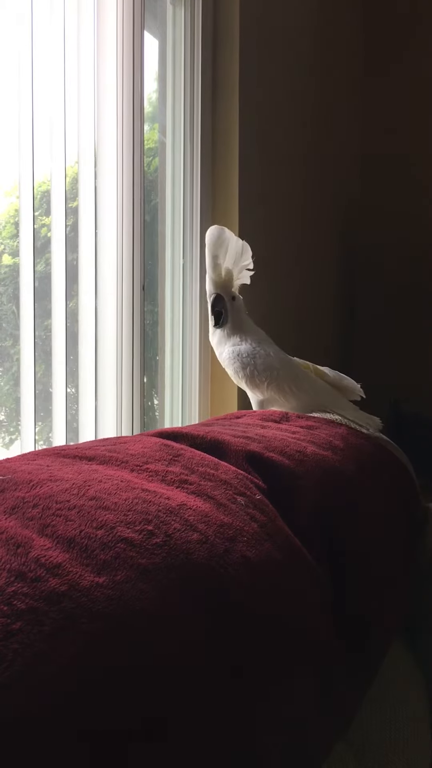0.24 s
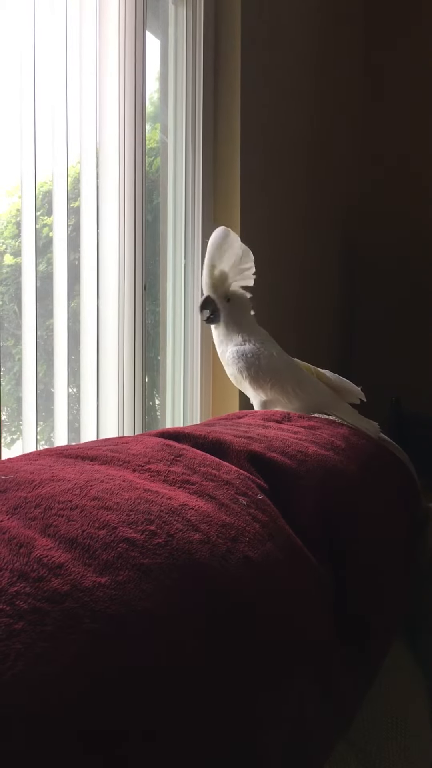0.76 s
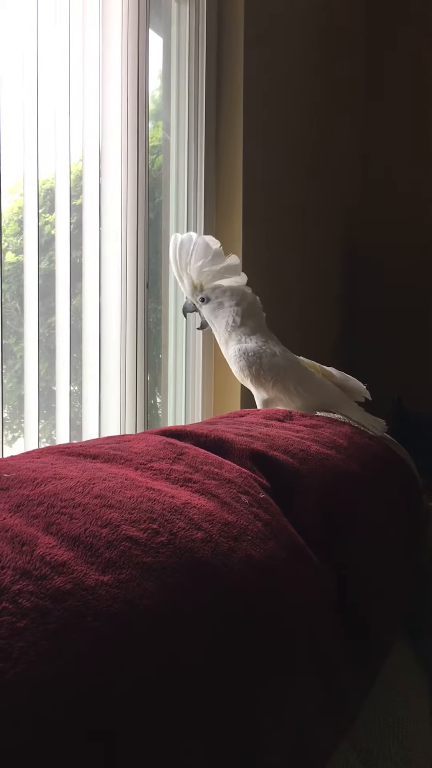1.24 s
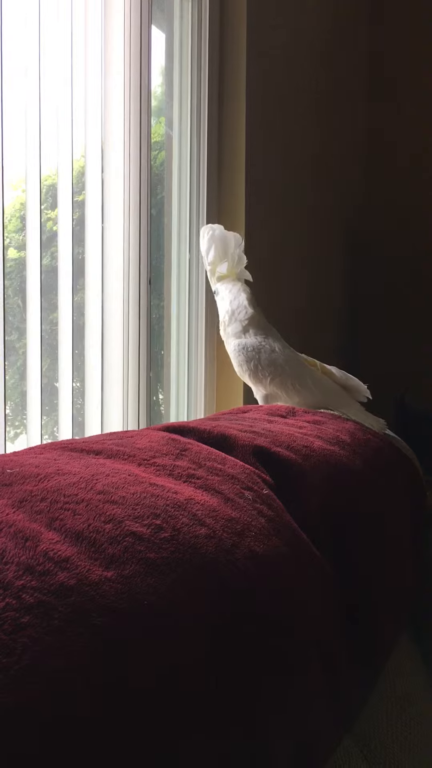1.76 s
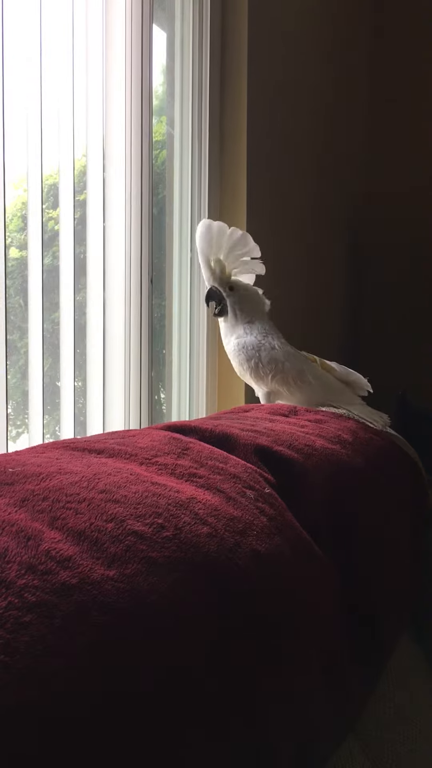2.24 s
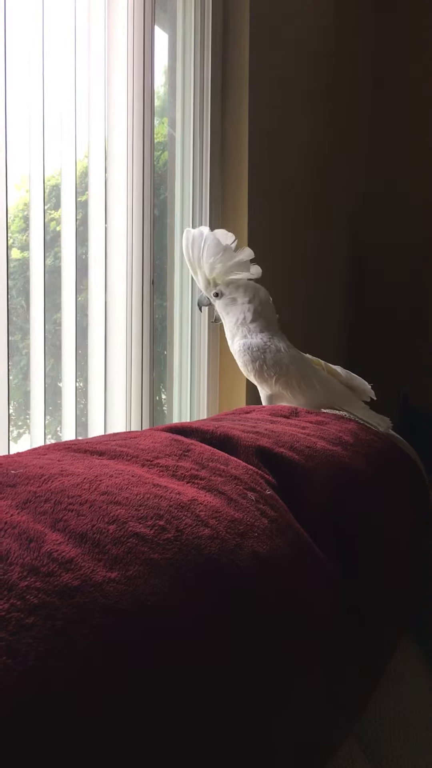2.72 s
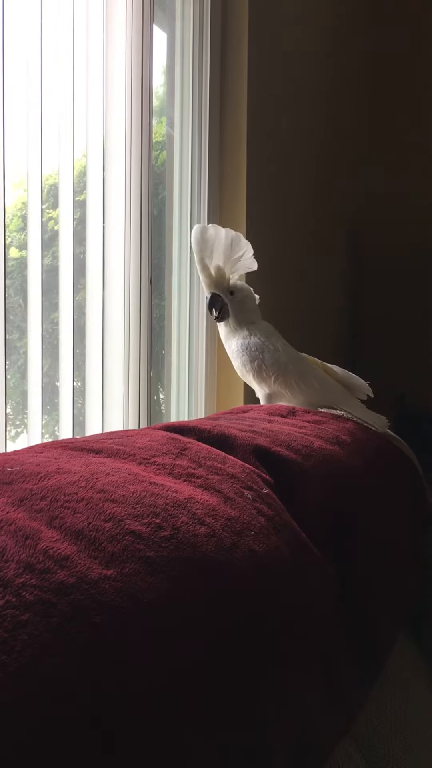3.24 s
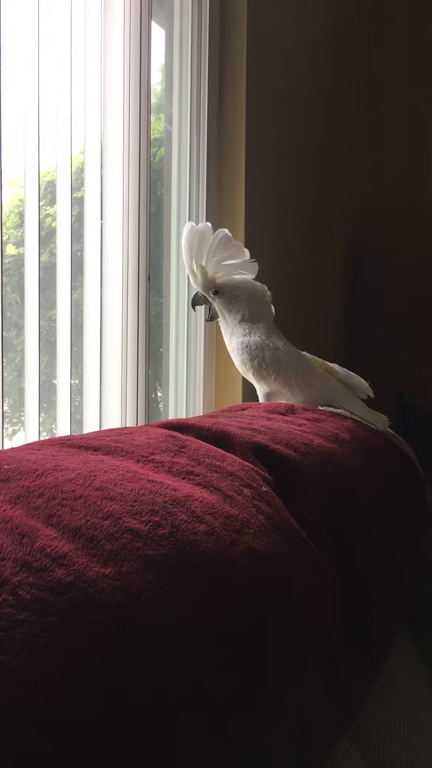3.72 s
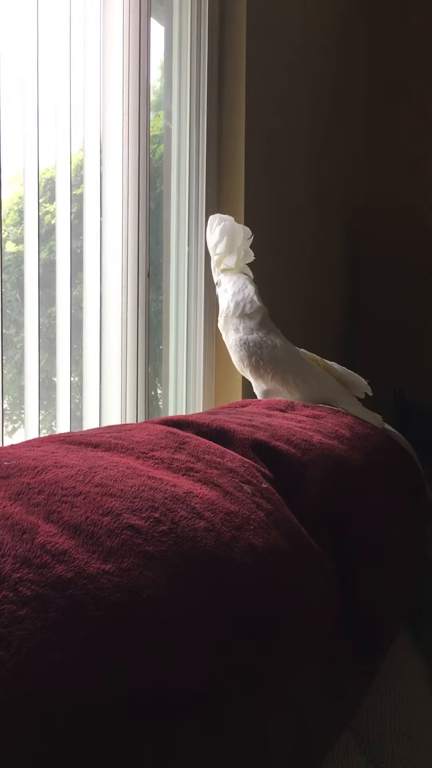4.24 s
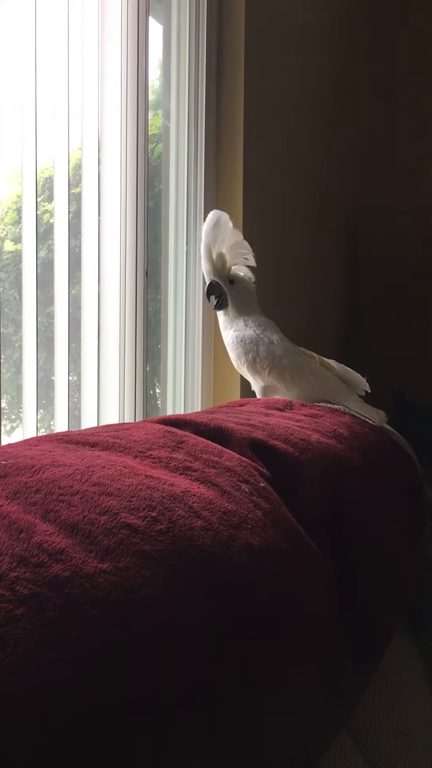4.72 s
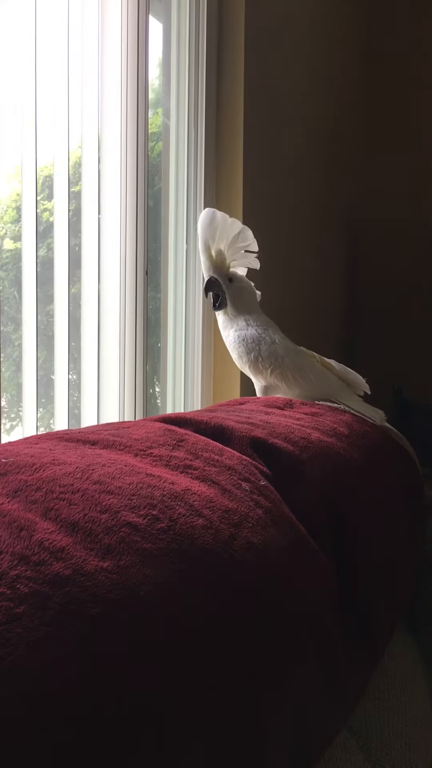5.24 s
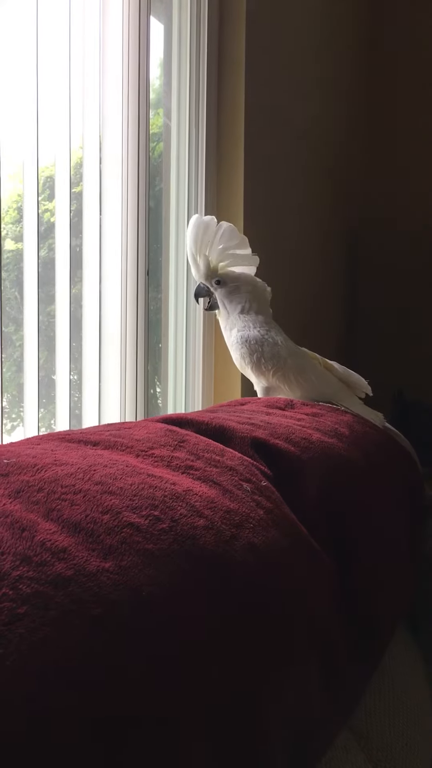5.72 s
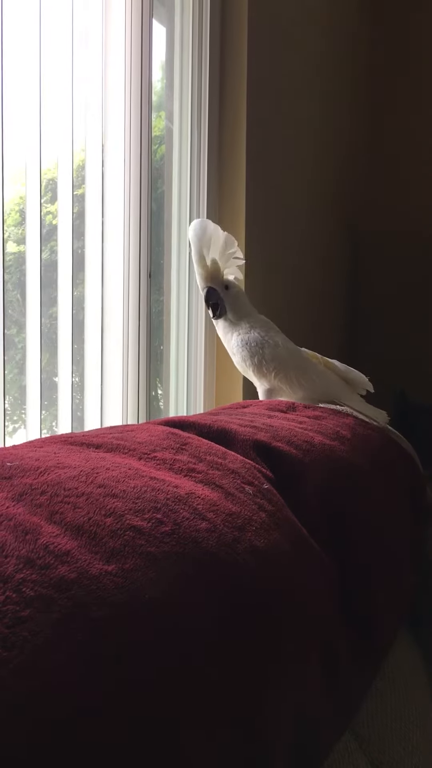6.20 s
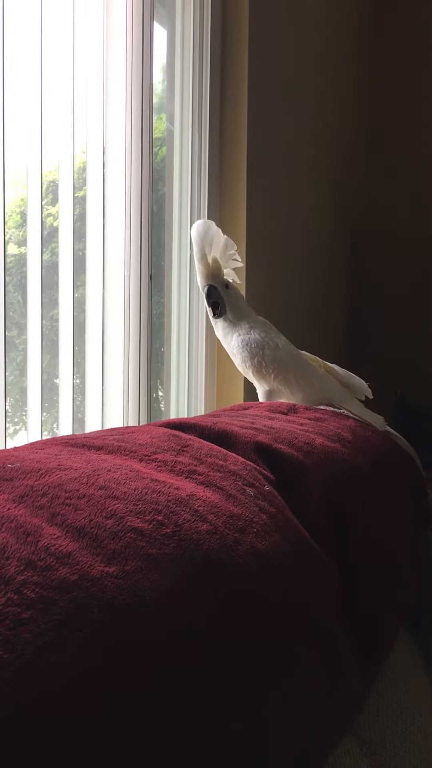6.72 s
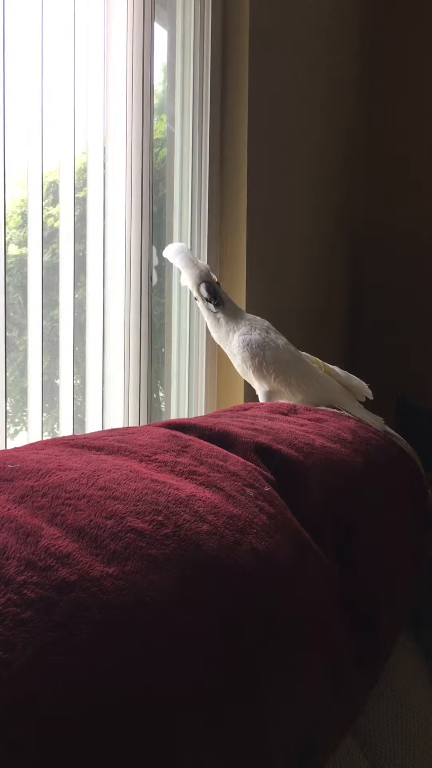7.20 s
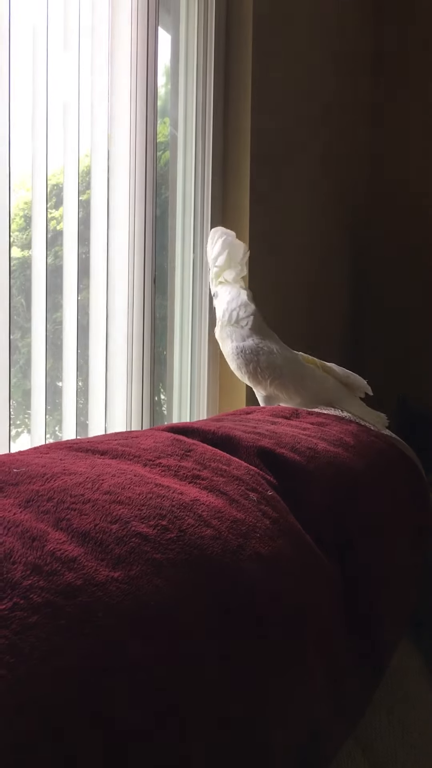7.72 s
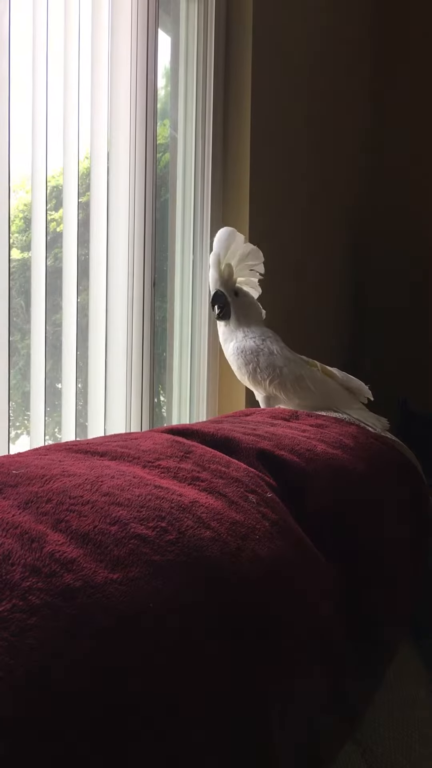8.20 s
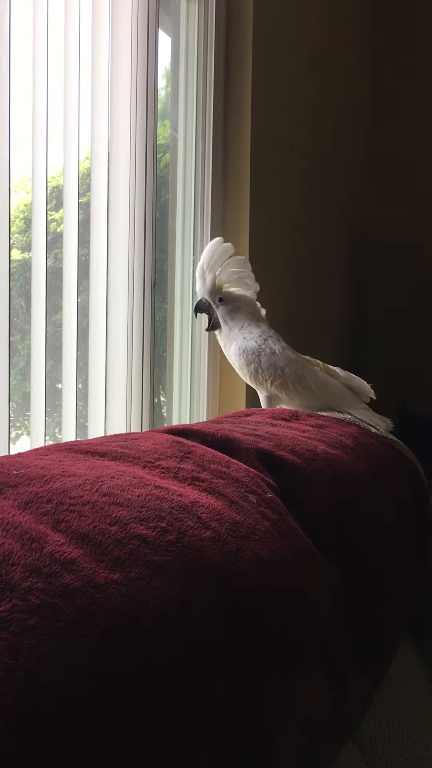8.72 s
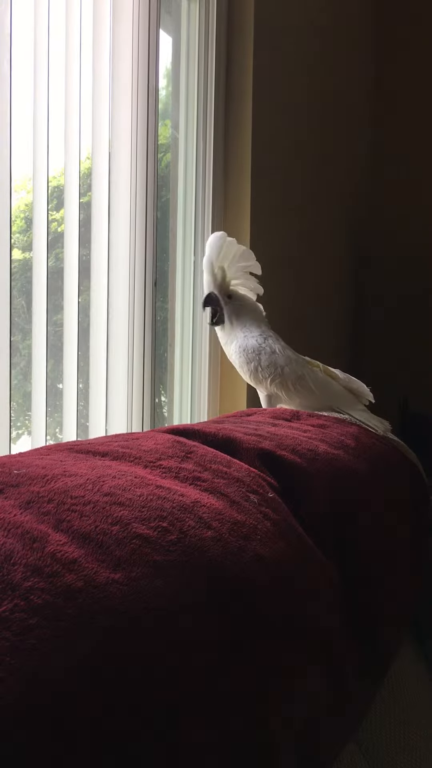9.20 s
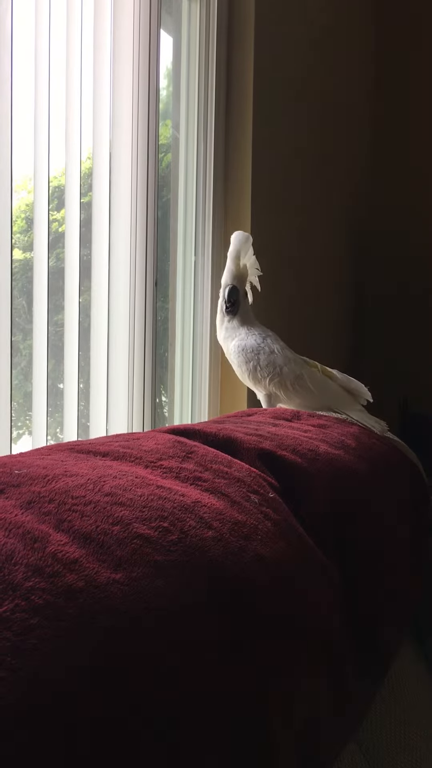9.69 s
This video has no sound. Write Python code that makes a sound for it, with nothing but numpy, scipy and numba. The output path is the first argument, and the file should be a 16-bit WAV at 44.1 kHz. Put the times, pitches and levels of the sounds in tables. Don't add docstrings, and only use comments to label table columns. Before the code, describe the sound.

A cockatoo screeches piercingly every second or so in a ringing living room while a small dog answers with distant yelps sinking into howls.

```python
import sys
import numpy as np
from scipy import signal
from scipy.fft import rfft, irfft
from scipy.io import wavfile
from scipy.ndimage import uniform_filter1d, minimum_filter1d
from numba import njit

SR = 44100
rng = np.random.default_rng(int(sys.argv[2]) if len(sys.argv) > 2 else 0)


def output_pcm(signal):
    pcm = np.clip(np.atleast_2d(signal).T, -1, 1) * 32767
    wavfile.write(sys.argv[1], SR, np.round(pcm).astype(np.int16))


def nominal_scale(level):
    x = np.asarray(level, float) / 20
    return 10 ** x


N = 438794
TIME = np.arange(N) / SR


def band(x, lo_hz, hi_hz, order=3):
    return signal.sosfilt(signal.butter(order, [lo_hz, min(hi_hz, .45 * SR)], "band", fs=SR, output="sos"), x)


def unit(x):
    return x / np.sqrt(np.mean(x ** 2))


def colour(x, points):
    hz, db = np.transpose(points)
    log_hz = np.log(np.fft.rfftfreq(2048, 1 / SR) + 1)
    cepstrum = irfft(np.interp(log_hz, np.log(hz), db) * np.log(10) / 20)
    cepstrum[1:1024] *= 2
    cepstrum[1025:] = 0
    response = irfft(np.exp(rfft(cepstrum)))[:1024]
    return signal.fftconvolve(x, response)[:len(x)]


def play(calls, rise_s, fall_s):
    rows = np.concatenate(calls)
    gate = 0
    for c in calls:
        nearest_end = np.minimum((TIME - c[0][0]) / rise_s, (c[-1][0] - TIME) / fall_s)
        gate = gate + np.clip(nearest_end, 0, 1)
    return [np.interp(TIME, rows[:, 0], column) for column in rows.T[1:]], gate


def walk(rate):
    k = int(SR / rate)
    levels = np.repeat(rng.standard_normal(N // k + 1), k)
    return unit(uniform_filter1d(uniform_filter1d(levels, k), k)[:N])


def cry(held, beak, rasp):
    start, (end, _, db) = held[0][0], held[-1]
    rasp_s, _, swell_db, hz = rasp
    swell = (end + rasp_s / 2, hz, db + swell_db)
    last = (end + rasp_s, hz, db + swell_db - 9.5)

    def drift(s, ends):
        return np.interp(s, [max(start, 0), end], ends)

    return [(*row, drift(row[0], beak[:2]), drift(row[0], beak[2:4]), beak[4]) for row in [*held, swell, last]]


def lost_beat(hz, cries, rasps):
    # (from t/s, to t/s, chaos 0-1, strong-weak pairing 0-1)
    slips = [(0, .06, .08, .1), (.06, .11, .18, .1), (.11, .29, .03, 0), (2.425, 2.445, .2, 0),
             (2.79, 2.85, .1, .35), (3.63, 3.705, .17, .45), (3.738, 3.752, .12, 0),
             (3.88, 3.955, .03, .15), (3.955, 4.045, .18, .2), (4.045, 4.172, .04, .3),
             (5.05, 5.085, .08, .2), (5.2, 5.235, .2, 0), (6.732, 6.762, .07, .4), (7.59, 7.63, .06, .1),
             (8.76, 8.83, .3, .3), (8.83, 8.885, .2, .5), (8.89, 9.0, .045, .7), (9.0, 9.045, .17, .3),
             (9.79, 9.9, 1, 0)]
    chaos = np.clip((960 - hz) / 1800, .0006, .16)
    double = np.clip((1000 - hz) / 500, 0, .4)
    spans = []
    for c, (rasp_s, wild, *_) in zip(cries, rasps):
        end = c[-1][0]
        stop = end + rasp_s + .01
        spans.append((end, stop, .4 * wild, .18))
        spans.append((end + .35 * rasp_s, stop, wild, 0))
    for start, stop, wild, pair in spans + slips:
        inside = (TIME >= start) & (TIME < stop)
        chaos[inside], double[inside] = wild, pair
    chaos, double = uniform_filter1d(chaos, size=900), uniform_filter1d(double, size=900)
    return chaos * nominal_scale(3 * walk(70)), double


@njit
def syrinx(hz, chaos, double, chance, stray, scatter):
    out, phase, k = np.zeros(len(hz) + 16), 0., 0
    for i in range(len(hz)):
        step = hz[i] * np.exp(stray * (chaos[i] * chance[k, 0] + double[i] * (k % 2 - .5) / 4)) / SR
        phase += step
        if phase >= 1:
            phase, k = phase - 1, k + 1
            size = np.exp(scatter * chaos[i] * chance[k, 1]) * (1 + double[i] * (2 * (k % 2) - 1))
            for j in range(16):
                d = j - 8 + phase / step
                out[i + j] += size * np.sinc(.85 * d) * (.5 + .5 * np.cos(np.pi * d / 8.5))
    return out[8:len(hz) + 8]


def cockatoo():
    # (t/s, clicks a second f/Hz, level/dB)
    cries = [
        [(-.2, 1028, -7), (.095, 1008, -10.5), (.114, 1029, -12.5), (.206, 1006, -9.5), (.29, 893, -14.5)],
        [(.96, 1034, -9), (1.326, 1040, -12.5), (1.486, 1023, -12.5), (1.525, 985, -16.5)],
        [(2.35, 1035, -10), (2.48, 1098, -6.5), (2.636, 1080, -12), (2.79, 1031, -12.5)],
        [(3.635, 1008, -11), (3.73, 1028, -10), (3.753, 1081, -8), (3.953, 1013, -12.5), (3.98, 1052, -12),
         (4.172, 1048, -13.5)],
        [(4.98, 1035, -5), (5.065, 1011, -9.5), (5.09, 1051, -4), (5.196, 1013, -9.5), (5.248, 1035, -11),
         (5.408, 1041, -8.5), (5.48, 980, -11.5)],
        [(6.19, 1040, -7.5), (6.294, 1078, -8), (6.586, 1019, -8), (6.74, 998.6, -11)],
        [(7.52, 1048, -10), (7.63, 1075, -8), (7.83, 1112, -9.5), (7.95, 1054, -13.5)],
        [(8.73, 1119, -2), (8.912, 1175, -16.5), (8.982, 1139, -13.5), (9.17, 1143, -12), (9.24, 1041, -14)],
        [(9.8, 982, -36.5), (9.9, 974, -24)],
    ]
    # (third partial first and last level/dB,
    # fourth partial first and last level/dB, upper partials level/dB)
    beaks = [(-9.5, -5.5, -18.5, -9, -11), (-4, -9, 1.5, -1.5, -11.5), (-6, -11.5, -10.5, -2, -13),
             (-5, -10.5, -18.5, -21.5, -13.5), (-13, -9.5, -7, -8, -12.5), (-9, -15.5, -10.5, -5.5, -10.5),
             (-7.5, -16.5, -2, -1, -12), (-6.5, -1.5, -4, -12, -11), (-2, -2.5, -5.5, 0, -4)]
    # (length t/s, chaos 0-1, swell level/dB, clicks a second f/Hz)
    rasps = [(.035, .3, -7.5, 800), (0.059, .5, 3.5, 1030), (.11, .65, -1, 1000), (.083, .7, 5, 1040),
             (.11, .7, -7.5, 1000), (.075, .5, -4, 990), (.075, .45, 3, 1060), (.065, 0.7, 1, 1100),
             (.08, 0.8, 0, 981)]
    # (catch t/s, drag t/s, depth f/Hz)
    catches = [
        (1.135, .05, 12),
        (2.45, .06, 65),
        (5.085, .05, 50),
        (6.291, 0.038, 30),
        (6.5, 0.06, 12),
        (6.601, .05, 8),
        (7.791, .05, 13),
        (9.13, .06, 15),
    ]
    # (f/Hz, level/dB)
    throat = [(500, -19), (1050, -13), (1600, -3), (2100, 2), (2650, -14), (3300, -6), (4300, -5),
              (5300, -11), (6300, -15.5), (7800, -19), (9300, -28.5), (10500, -32), (13000, -38.5),
              (15500, -42.5)]

    calls = [cry(*parts) for parts in zip(cries, beaks, rasps)]
    (hz, db, third_db, fourth_db, hiss_db), gate = play(calls, 0.0043, 0.0097)
    starts = np.array([c[0][0] for c in cries])
    age = TIME - starts[np.searchsorted(starts, TIME, side="right") - 1]
    hz = hz * (1 - .44 * np.exp(-(age / .035) ** 1.5))
    for s, drag_s, depth_hz in catches:
        hz = hz - depth_hz * np.interp(TIME, [s - drag_s, s, s + .012], [0, 1, 0])
    db = db - 31.5 * np.exp(-age / 0.015)

    chaos, double = lost_beat(hz, cries, rasps)
    wobble = 1 + .005 * walk(28) + .0025 * walk(70) + .001 * walk(150)
    clicks = syrinx(hz * wobble, chaos, double, rng.standard_normal((N // 20, 2)), .25, .4)
    breath = nominal_scale(-60) * (1 + 300 * chaos) * rng.standard_normal(N)
    voice = unit(colour(unit(clicks - clicks.mean()) + breath, throat))

    low = band(voice, 230, 2120, order=2)
    third = nominal_scale(third_db + 3.34 * walk(12) + 10) * band(voice, 2333, 4004)
    fourth = nominal_scale(fourth_db + 3.34 * walk(12) + 1) * band(voice, 4050, 4573)
    edges = 4750 * 1.28 ** np.arange(6)
    hiss = 0
    for k in range(5):
        hiss = hiss + (-1) ** k * nominal_scale(4.3 * walk(16)) * band(voice, *edges[k:k + 2])
    beak = third - fourth
    return nominal_scale(db - 2) * gate * (low - beak - nominal_scale(hiss_db + 8) * hiss) + whistles(wobble)


def still_room():
    # (f/Hz, level/dB)
    air_colour = [(30, -26), (52, 0), (80, -8), (130, -10), (220, -13), (400, -21), (1000, -28),
                  (4000, -36), (10000, -38), (15500, -40)]
    air = unit(colour(rng.standard_normal(N), air_colour)) * nominal_scale(-61)
    hum = nominal_scale(-58 + 1.5 * walk(3.3)) * np.sin(2 * np.pi * 59.7 * TIME)
    return air + hum


def yelp(row, shape, howl):
    s, top_hz, db, held_s, second_db = row
    jump_s, fade = shape
    top_after_s = .045
    rows = [(s, .77 * top_hz, db - 22.5),
            (s + jump_s, 0.99 * top_hz, db),
            (s + jump_s + top_after_s, top_hz, db - fade * top_after_s),
            (s + held_s, 0.96 * top_hz, db - fade * (held_s - jump_s)), *howl]
    out = []
    for t, hz, first_db in rows:
        mouth_db = 14.5 * np.exp(-((2 * hz - 1440) / 300) ** 2)
        out.append((t, hz, first_db, first_db + second_db + mouth_db))
    return out


def dog():
    # (t/s, top pitch f/Hz, peak level/dB, held t/s, second partial against first level/dB)
    yelps = [(.27, 1028, -18, .18, -18), (1.22, 1026, -15.5, .13, -16), (2.015, 1067, -14, .155, -19),
             (2.179, 1060, -42, .17, -16.5), (2.62, 1008, -19, .16, -12), (3.66, 795, -25, .11, -23.5),
             (3.99, 790.6, -27.5, .2, -10), (4.629, 903, -18, .09, -18.5), (5.47, 822.4, -26, .13, -17),
             (6.71, 1062, -18.5, .2, -23), (7.29, 1051, -14, .13, -19.5), (7.92, 1015, -17, .15, -22),
             (8.47, 831.8, -20.5, .13, -16), (9.515, 1047, -17, .2, -19)]
    # (jump t/s, fade dB/s)
    shapes = [(.04, 134), (.033, 123.5), (.042, 135.5), (0.02014, 24), (.044, 194), (.038, 247), (.05, 204),
              (.025, 255.5), (.027, 115.5), (.05, 248), (.045, 194), (.032, 180), (.035, 45),
              (0.032, 160.5)]
    # (t/s, pitch f/Hz, level/dB)
    howls = [
        [(.498, 812, -28.5), (.696, 746.6, -40), (.864, 618, -46.5), (.95, 644, -81)],
        [(1.46, 783, -31), (1.578, 786, -40), (1.644, 696, -41), (1.92, 649, -68)],
        [],
        [],
        [(2.85, 707.4, -42), (3.104, 653.7, -46), (3.282, 524, -47), (3.38, 525, -70)],
        [(3.83, 666, -46), (3.97, 569, -39.5)],
        [],
        [(4.862, 674, -47), (4.92, 560, -42.5), (5.0, 532, -42)],
        [(5.68, 701, -50), (5.93, 646, -46), (6.2, 506, -46.5), (6.326, 494.4, -43.5), (6.51, 547, -60),
         (6.7, 537, -80.5)],
        [],
        [(7.492, 882, -27), (7.558, 697, -44.5), (7.7, 651, -52)],
        [(8.182, 691, -46), (8.25, 687, -68)],
        [(8.63, 718.4, -42.5), (8.706, 499.6, -52), (8.95, 459, -50.5), (9.084, 682, -45), (9.2, 622.5, -52)],
        [],
    ]
    calls = [yelp(*parts) for parts in zip(yelps, shapes, howls)]
    (hz, first_db, second_db), gate = play(calls, 0.0071, 0.013)
    strain = np.clip((hz - 850) / 150, 0, 1)
    shaken_hz = hz * (1 + .006 * walk(40) + .045 * strain * walk(120))
    turn = 2 * np.pi * np.cumsum(shaken_hz) / SR
    second_third = np.sin(2 * turn) + nominal_scale(-18.5) * np.sin(3 * turn)
    upper = sum(np.sin(k * turn) * np.sin(np.pi * k / 14) ** 2 for k in range(4, 14))
    voice = nominal_scale(first_db) * np.sin(turn) + nominal_scale(second_db - 0.5) * second_third
    voice = voice + nominal_scale(first_db - 39.5) * (1 - strain) * upper
    return (gate * voice + split_tone()) * nominal_scale(2.0 * strain * walk(90)) + puffs(turn)


def puffs(turn):
    # (t/s, peak level/dB)
    puff_times = [(0.2859, -14), (1.2223, -15), (2.019, -14.5), (2.6274, -16.5), (4.6368, -17),
                  (5.4716, -15.5), (6.7333, -16.5), (7.3022, -12.5), (7.9216, -10.5), (8.4751, -26),
                  (9.5226, -15)]
    # (f/Hz, level/dB)
    muzzle = [(250, -27.5), (500, -18), (1000, 5), (1700, 0), (2100, 5.5), (2500, 7.5), (3100, -12.5),
              (3700, -14), (4700, -17.5), (6500, -10), (9000, -22), (15000, -35)]
    blow = 0
    for s, peak_db in puff_times:
        age = np.maximum(TIME - s + 0.01, 0)
        blow = blow + nominal_scale(peak_db) * (age / 0.035 * np.exp(1 - age / 0.034)) ** 2
    bursts = rng.standard_normal(N) * (1 + np.cos(turn))
    return nominal_scale(-15.5) * blow * unit(colour(bursts, muzzle)) * nominal_scale(walk(150))


def split_tone():
    # (t/s, length t/s, pitch f/Hz, level/dB)
    splits = [
        (0.334, 0.054, 1225, -21.5),
        (1.275, 0.098, 1224, -26),
        (2.085, 0.041, 1232, -26.5),
        (2.673, 0.032, 1235, -18.5),
        (4.656, 0.028, 1226, -18),
        (6.816, 0.081, 1268, -31.5),
        (7.352, 0.038, 1217, -21.5),
        (7.998, 0.07, 1165, -26.5),
        (9.572, 0.034, 1303, -21.5),
    ]
    out = 0
    shake = 0.024 * walk(110)
    for s, length, hz, db in splits:
        age = np.clip((TIME - s) / length, 0, 1)
        glide = hz * (1 - 0.2 * np.exp(-age / 0.24) + shake)
        out = out + nominal_scale(db) * np.sin(np.pi * age) ** .5 * np.sin(2 * np.pi * np.cumsum(glide) / SR)
    return out


def whistle_rows(s, length, from_hz, to_hz, db):
    return [(s + k * length, from_hz + k * (to_hz - from_hz), db + drop_db)
            for k, drop_db in ((0, -12), (0.4, 0), (1, -19))]


def whistles(wobble):
    # (t/s, length t/s, first pitch f/Hz, last pitch f/Hz, peak level/dB)
    tones = [
        (2.28, 0.22, 1534, 1441, -18),
        (3.72, .16, 197, 178.4, -36),
        (4.07, 0.17, 2760, 2410, -18),
        (4.23, .2, 2480, 2470, -30),
        (4.23, .2, 2495, 2460, -30),
        (4.931, 0.16, 1521, 1450, -15),
        (7.85, .11, 1800, 1510, -25),
    ]
    (hz, db), gate = play([whistle_rows(*tone) for tone in tones], 0.022, 0.012)
    return gate * nominal_scale(db) * np.sin(2 * np.pi * np.cumsum(hz * wobble) / SR)


def room(x, wet_db, gap_s):
    # (octave centre f/Hz, t/s)
    octaves = [(500, .7), (1000, .75), (2000, .68), (4000, .6), (8000, .62), (13000, .62)]
    t = np.arange(SR) / SR
    noise = rng.standard_normal(SR)
    tail = sum(band(noise, hz / 1.414, hz * 1.414, order=4) * nominal_scale(-60 * t / t60) for hz, t60 in octaves)
    tail *= np.clip(t / gap_s, 0, 1) ** 2 * (1 + 1.46 * nominal_scale(-60 * t / .2))
    tail /= np.sqrt(np.sum(tail ** 2))
    return x + nominal_scale(wet_db) * signal.fftconvolve(x, tail)[:N]


def scene():
    bird = room(cockatoo(), -4, 0.00067)
    far_dog = nominal_scale(5.5) * room(dog(), 0.84, 0.012)
    return (bird + far_dog + still_room())[None]


def band_limit(x):
    return signal.sosfilt(signal.butter(12, 15680, fs=SR, output="sos"), x)


def record(dry):
    need = np.minimum(1, .97 / (np.abs(dry) + 1e-9))
    held = dry * uniform_filter1d(minimum_filter1d(need, size=181), size=90)
    mix = signal.sosfilt(signal.ellip(8, .2, 70, 15750, fs=SR, output="sos"), held)
    return band_limit(mix)


dry = scene()
out = record(dry)
output_pcm(out)
```